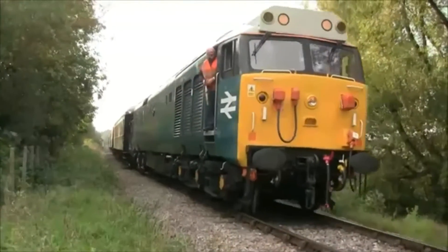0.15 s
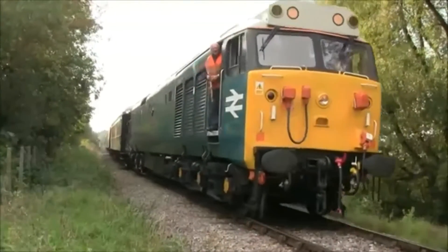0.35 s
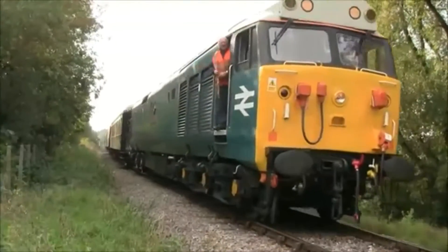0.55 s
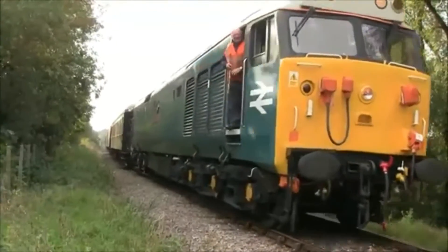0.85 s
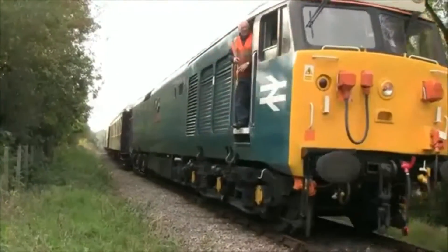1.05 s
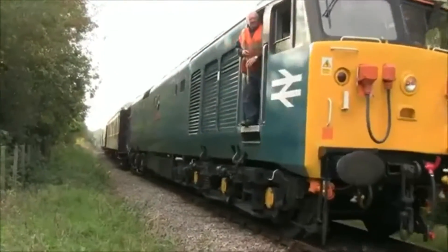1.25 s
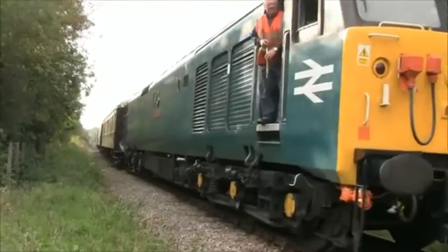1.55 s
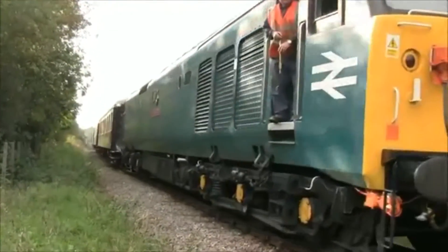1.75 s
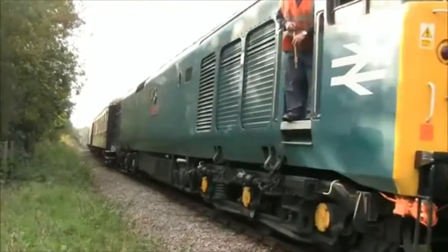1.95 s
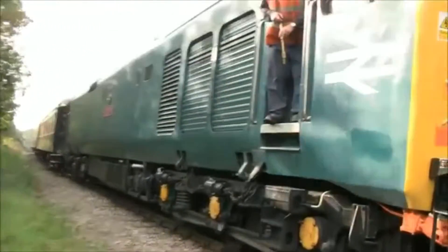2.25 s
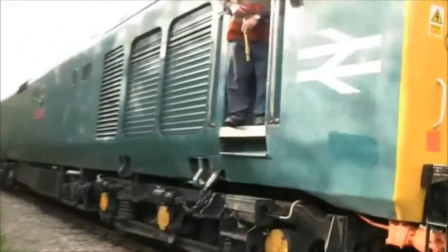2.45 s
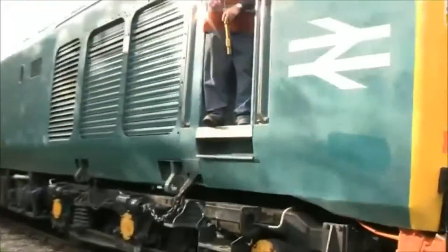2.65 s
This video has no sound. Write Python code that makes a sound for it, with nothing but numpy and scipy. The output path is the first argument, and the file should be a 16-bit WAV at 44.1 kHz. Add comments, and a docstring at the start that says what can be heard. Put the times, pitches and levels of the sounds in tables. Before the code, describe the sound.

A diesel locomotive rolls past close by, engine throbbing loudly over hissing steel wheels.

```python
"""A sixteen-cylinder diesel locomotive engine runs hard and steadily as it rolls along the track.
Its uneven firings ring down the exhaust pipe and throb over a deep, beating boom. The engine room
clatters, and gears and blowers whine. Steel wheels roar, hiss and ring on the rails, and near the
start a flange (the lip of a wheel) squeals briefly. A bright hiss surges about twice a second."""
import sys
import numpy as np
from scipy import signal
from scipy.fft import rfft, irfft, next_fast_len
from scipy.io import wavfile
from scipy.ndimage import uniform_filter1d, minimum_filter1d, map_coordinates

SR = 44100
rng = np.random.default_rng(int(sys.argv[2]) if len(sys.argv) > 2 else 0)


def to_wav(sig):
    """Store sig (one row per channel, or 1-D mono) as 16-bit WAV at the path in sys.argv[1].

    Samples outside -1..1 are clipped; the rate is SR.
    """
    pcm = np.clip(np.atleast_2d(sig), -1, 1) * 32767
    pcm = np.round(pcm).astype(np.int16)
    wavfile.write(sys.argv[1], SR, pcm.T)  # frames by channels


N = 123479

CYCLE_HZ, CYLINDERS = 7.66, 16  # in one cycle the crank turns twice and each cylinder fires once
SIDES = np.array([[.5], [-.5]])  # each channel's share of a left-right difference

# tone colour of the low and the upper exhaust (frequency [Hz], relative level [dB])
LOW_EXHAUST_SPECTRUM = [(15,-42),(30,-25),(39,-13),(51,-18),(85,-10),(120,-3),(175,-.5),(215,-1.5),(280,-14),(600,-40),(2000,-120)]
UPPER_EXHAUST_SPECTRUM = [(40,-66),(120,-10),(190,-13),(225,-0.5),(290,2),(345,1),(410,-5),(700,-54),(2000,-24),(6000,-120)]
# how alike the exhaust is left and right (frequency [Hz], likeness [0 to 1])
EXHAUST_LIKENESS = [(150,.99),(500,.96)]
# the engine's volume controls (time [s], low exhaust [dB], upper exhaust [dB], engine room [dB])
ENGINE_GAINS = [(0,-17.5,-17.5,-17),(0.25,-19.5,-23,-16.5),(0.55,-19,-19,-17),(0.85,-15.5,-17.5,-16.5),(1.05,-21.5,-17,-17),(1.25,-16.5,-18.5,-15),(1.45,-17.5,-20,-16),(1.62,-19,-15.5,-15),(1.8,-18,-17.5,-16),(2.05,-16.5,-17.5,-13),(2.25,-20.5,-17.5,-14.5),(2.45,-16,-16.5,-15),(2.8,-20.5,-20,-16.5)]
# heavy exhaust beats that set the pipe booming (peak time [s], pitch [Hz], level [dB])
PIPE_BEATS = [(.14,177,-16),(.34,350,-19),(.8,172,-14),(.94,166,-23),(1.37,170,-18.5),(1.45,220,-16.5),(2.12,269,-15.5),(2.28,294,-21),(2.43,294,-16.5),(2.46,226,-16.5),(2.55,258,-18)]
# the deep boom (time [s], pitch [Hz], level [dB])
DEEP_BOOM = [(0,62,-23),(.15,61.4,-20.5),(.24,64,-22),(.3,63.4,-38),(.38,62.3,-18.5),(.47,61.2,-22.5),(.58,63.6,-20),(.66,64.4,-32.5),(.78,60.4,-20),(.92,61,-23),(1.0,72.8,-20),(1.62,72.15,-22),(2.05,72.1,-22),(2.17,72.6,-28),(2.27,73.2,-20.5),(2.4,75,-23),(2.52,76,-31.5),(2.62,73,-19.5),(2.8,72.9,-26)]
# strong tones in the engine's hum (pitch [times the cycle rate], level [dB])
HUM_TONES = [(19,-32),(22,-31),(24,-27.5),(29,-32),(32,-34),(34,-32),(36,-32),(40,-33),(42,-35)]
# tone colour of the engine room (frequency [Hz], relative level [dB])
ROOM_SPECTRUM = [(40,-90),(200,-9.5),(400,-17.5),(520,-3.5),(660,2),(830,0.2),(930,-5.5),(1050,-9),(1500,-12.5),(3000,-27.5),(7000,-36.5),(12000,-120)]
# whines of gears and blowers (pitch [Hz], level [dB])
GEAR_WHINES = [(476.3,-31.5),(508.6,-35),(952.8,-38)]
# one more whine that comes and goes (time [s], level [dB])
SWELLING_WHINE = [(0,-22),(.13,-27),(.25,-42),(.85,-32),(1.08,-25),(1.17,-19.5),(1.32,-37),(1.62,-33),(1.8,-24),(2.0,-28.5),(2.6,-29),(2.8,-24.5)]
# the wheels' volume controls (time [s], roar [dB], hiss [dB])
WHEEL_GAINS = [(0,-17,-24),(0.4,-19.5,-23.8),(0.7,-18.5,-26),(1.3,-18.5,-26.5),(2,-21,-27),(2.8,-19.5,-26.5)]
# tone colour of the wheels' roar and hiss (frequency [Hz], relative level [dB])
ROAR_SPECTRUM = [(40,-74),(300,-15.5),(900,-7),(1250,0.5),(1520,1.5),(1900,-0.5),(2450,-4.5),(2780,-3),(3100,-7.5),(5000,-9),(8000,-65),(14000,-90)]
HISS_SPECTRUM = [(300,-70),(1500,-42),(3000,-1.5),(3600,0),(4000,1),(4190,1.5),(4400,0.5),(4900,-5),(5600,-4),(6500,-10),(8500,-10),(11000,-16),(14000,-24),(15300,-38)]
# how alike the hiss and its surges are left and right (frequency [Hz], likeness [0 to 1])
HISS_LIKENESS = [(3000,0.47),(5000,0.23),(6500,0.92),(8000,0.47),(11000,0.27),(15000,0.32)]
# jolts of the wheels and axles (peak time [s], boost [dB])
WHEEL_JOLTS = [(.11,1),(.46,1),(.64,1),(.83,1.5),(1.0,1.5),(1.32,0.5),(1.42,1),(1.58,2),(1.72,1.1),(1.91,2.5),(2.04,1.3),(2.16,3),(2.35,1),(2.52,3),(2.63,0.9)]
# notes at which wheels and rails ring (pitch [Hz], nominal width [Hz], relative level [dB])
STEEL_NOTES = [(248.7,12,-1.5),(443.6,20.7,5),(492.7,57,2),(559,23,7),(587,19,4),(726,19,-8),(894,17,-1),(968,85,-6.5),(1170,42,-1.5),(1490,52,-3),(1720,28,-19),(2207,63,-7.5),(2348,54,-8),(2834,64,-9),(3476,58,-12.5),(4164,62,-10.5)]
# brief rings of the wheels (peak time [s], pitch [Hz], level [dB])
WHEEL_RINGS = [(.12,2745,-28),(.17,3299,-31),(.54,2740,-27.5),(.64,1550,-24.5),(.97,4420,-34),(1.07,1330,-23),(1.6,1527,-25),(1.78,2740,-29.5),(2.15,4424,-29.5),(2.42,2820,-29)]
# noisy parts of the squeal (start [s], peak [s], end [s], start pitch [Hz], end pitch [Hz],
# width [Hz], level [dB], left minus right [dB])
SQUEAL_BANDS = [(0.08,0.21,.35,5540,6080,260,-21.5,-4),(.13,0.3,.58,8000,8650,800,-26,0),(.03,0.3,0.6,5500,5300,800,-23,-1.5),(.6,0.635,0.68,12600,12600,300,-35,0)]
# the rough tone at the core of the squeal (time [s], pitch [Hz], level [dB])
SQUEAL_CORE = [(.1,5600,-55),(.16,5720,-29),(.21,5830,-26),(.25,5970,-16),(.28,6040,-27),(.34,6100,-80)]
# short surges of bright hiss, about two a second (start time [s], level [dB])
HISS_SURGES = [(.42,-31),(.895,-33),(1.355,-30),(1.84,-31),(2.295,-30.5)]
# tone colour of the surges (frequency [Hz], relative level [dB])
SURGE_SPECTRUM = [(3000,-25),(5000,1),(7000,4),(10000,-4),(13000,-8),(15500,-14)]
# how far the left microphone's wave is ahead of the right's (frequency [Hz], lead [radians])
MIC_LEAD = [(2900,0),(3500,.3),(4200,.8),(5200,1.95),(6000,3.0),(6500,3.14)]
# how much louder the left microphone is (frequency [Hz], left minus right [dB])
MIC_PAN = [(2600,0),(3500,-2.6),(4200,-4.4),(5000,-4.4),(6200,0),(7000,.6),(9500,4.2),(15000,2.6)]


def exhaust(cycle, spectrum, spread_db=3, jitter_s=0.00037, pipe_fade_s=0.13, throb=0.23):
    """Uneven firings ring down the pipe, with puffs of gas that swell once a crank turn."""
    fired = np.flatnonzero(np.diff(np.floor(cycle * CYLINDERS)))  # the sample of each firing
    strengths = amp(spread_db * rng.standard_normal(CYLINDERS))
    sizes = strengths[np.arange(len(fired)) % CYLINDERS]
    late = jitter_s * SR * rng.standard_normal(N)[fired]
    starts = np.clip(fired + late, 0, N - 1).astype(int)
    pulses = np.bincount(starts, sizes - sizes.mean(), N)  # only the unevenness is kept
    t = np.arange(SR // 4) / SR
    pipe = rng.standard_normal(len(t)) * amp(-60 * t / pipe_fade_s)
    ringing = signal.fftconvolve(pulses, pipe)[:N]
    notes = unit(filtered(ringing, lambda hz: amp(along(spectrum, hz))))
    puffs = shaped_noise(spectrum, EXHAUST_LIKENESS, 1 + throb * np.cos(2 * np.pi * 2 * cycle))
    return amp(-5.5) * notes + amp(-2) * puffs


def brief_rings(rows, width_s, waver_hz):
    """The pipe or a wheel rings: each row's note swells and fades, a little unsteady in pitch."""
    return sum(swell(peak, width_s) * tone(turns_of(hz + waver_hz * wobble(30.02)), db)
               for peak, hz, db in rows)


def boom_and_hum(cycle, waver_db=2):
    """A deep boom rises and dips under a hum whose pitch follows the engine's speed."""
    boom_hz, boom_db = curves(DEEP_BOOM)
    hum = sum(tone(multiple * cycle, db + waver_db * wobble(3.68)) for multiple, db in HUM_TONES)
    return tone(turns_of(boom_hz), boom_db) + hum


def engine_room(cycle, clatter=0.016):
    """Injectors and valves clatter: a flickering noise that pulses faintly with the firings."""
    pulsing = 1 + clatter * np.cos(2 * np.pi * CYLINDERS * cycle)
    likeness = [(600, 1.0), (1000, 0.73)]
    return amp(-0.5 + 1.23 * wobble(39.88)) * shaped_noise(ROOM_SPECTRUM, likeness, pulsing)


def whines(swelling_hz=812, waver_hz=0.96, waver_db=2):
    """Spinning gears and blowers sing thin, wavering tones."""
    whine = lambda hz, db: tone(turns_of(hz + waver_hz * wobble(11.8)), db)
    swelling = whine(swelling_hz, *curves(SWELLING_WHINE))
    return swelling + sum(whine(hz, db + waver_db * wobble(5.87)) for hz, db in GEAR_WHINES)


def wheels(judder_db=0.77, ring_db=-19.5):
    """Rough steel rolling on steel roars, hisses and rings, with jolts and a quick judder."""
    roar_db, hiss_db = curves(WHEEL_GAINS)
    jolts_db = sum(db * swell(peak, width_s=0.032) for peak, db in WHEEL_JOLTS)
    shake_db = jolts_db + judder_db * unit(np.gradient(wobble(39.87)))
    roar_gain = amp(roar_db - 2 + shake_db + 1.2 * wobble(70))
    roar = roar_gain * shaped_noise(ROAR_SPECTRUM, likeness=[(1300, 1.0), (3000, 0.95)])
    hiss = amp(hiss_db + shake_db + 0.46 * wobble(44.8)) * shaped_noise(HISS_SPECTRUM, HISS_LIKENESS)
    steel = lambda f: sum(amp(db) * (1j * f * width / (hz * hz - f * f + 1j * f * width)) ** 2
                          for hz, width, db in STEEL_NOTES)  # one narrow peak for each note
    ring = unit(filtered(rng.standard_normal((2, N)), steel))
    return roar + hiss + amp(ring_db + 2.1 * wobble(8.12)) * ring


def flange_squeal(stereo_spread=0.47, waver_hz=60, rough_db=3, core_pan_db=-4, lead_turns=-.08):
    """A wheel's lip scrapes the rail: a thin rising tone and narrow bands of noise swell and fade."""
    t = np.arange(N) / SR
    bands = np.zeros((2, N))
    for start, peak, end, from_hz, to_hz, width, db, pan_db in SQUEAL_BANDS:
        noise = rng.standard_normal(N) + stereo_spread * rng.standard_normal((2, N))
        flutter = unit(filtered(noise, lambda hz: 1 / (1 + (2 * hz / width) ** 2)))
        pitch_hz = np.interp(t, [start, end], [from_hz, to_hz])
        band = flutter * tone(turns_of(pitch_hz), db + SIDES * pan_db)  # smears the tone into noise
        bands += np.interp(t, [start, peak, end], [0, 1, 0]) * band
    core_hz, core_db = curves(SQUEAL_CORE)
    turns = turns_of(core_hz + waver_hz * wobble(251)) + SIDES * lead_turns
    return bands + tone(turns, core_db + rough_db * wobble(149) + SIDES * core_pan_db)


def hiss_surges(rise_s=0.018, hold_s=0.037, fall_s=0.073):
    """Short surges of bright hiss, about two a second."""
    t = np.arange(N) / SR
    corners = np.cumsum([0, rise_s, hold_s, fall_s])
    bursts = sum(amp(db) * np.interp(t - start, corners, [0, 1, 1, 0]) for start, db in HISS_SURGES)
    return bursts * shaped_noise(SURGE_SPECTRUM, HISS_LIKENESS)


def amp(db):
    """Turn decibels into a number to multiply by."""
    return 10 ** (np.asarray(db) / 20)


def unit(x):
    """Scale x to an average (rms) strength of 1."""
    return x / np.sqrt(np.mean(x ** 2) + 1e-20)


def along(points, hz):
    """Read between (frequency, value) points, spaced as musical pitch is."""
    frequencies, values = np.transpose(points)
    return np.interp(np.log(hz + 1), np.log(frequencies + 1), values)


def curves(rows):
    """Give one value per sample for each column after the time."""
    times, *columns = np.transpose(rows)
    return [np.interp(np.arange(N) / SR, times, column) for column in columns]


def wobble(rate):
    """A smooth curve through `rate` random points a second."""
    return map_coordinates(rng.standard_normal(4096), [np.arange(N) * rate / SR + 2], mode="mirror")


def swell(peak, width_s):
    """A bell-shaped rise and fall, at 61% height width_s either side of the peak."""
    return np.exp(-.5 * ((np.arange(N) / SR - peak) / width_s) ** 2)


def turns_of(hz):
    """Count the cycles completed at a changing rate."""
    return np.cumsum(hz) / SR


def tone(turns, db):
    """A sine wave at an average (rms) level, starting anywhere in its cycle."""
    return np.sqrt(2) * amp(db) * np.sin(2 * np.pi * (turns + rng.random()))


def filtered(x, response):
    """Scale and shift each frequency in x by response(hz)."""
    size = next_fast_len(N + SR // 2)
    return irfft(rfft(x, size) * response(np.fft.rfftfreq(size, 1 / SR)), size)[..., :N]


def shaped_noise(spectrum, likeness, pulsing=1):
    """Stereo noise of strength 1, pulsed and then given a tone colour."""
    def colour(hz):
        angle = np.arccos(np.clip(along(likeness, hz), -1, 1)) / 2  # 0 makes both sides the same
        return amp(along(spectrum, hz)) * [np.cos(angle), np.sin(angle)]
    mid, side = filtered(pulsing * rng.standard_normal((2, N)), colour)
    return unit(np.array([mid + side, mid - side]))


def scene(speed_drift=.0015):
    """One crankshaft times the exhaust, clatter and hum; the wheels run beneath."""
    cycle = turns_of(CYCLE_HZ * (1 + speed_drift * wobble(2)))
    low_db, upper_db, room_db = curves(ENGINE_GAINS)
    engine = amp(low_db) * exhaust(cycle, LOW_EXHAUST_SPECTRUM)
    engine += amp(upper_db) * exhaust(cycle, UPPER_EXHAUST_SPECTRUM)
    engine += brief_rings(PIPE_BEATS, width_s=0.032, waver_hz=3)
    engine += amp(room_db) * engine_room(cycle) + boom_and_hum(cycle) + whines()
    rolling = wheels() + brief_rings(WHEEL_RINGS, width_s=0.021, waver_hz=6)
    return engine + rolling + hiss_surges() + flange_squeal()


def record(dry, ceiling=.98, hold_s=.002, top_hz=15500):
    """Two microphones spread the treble; peaks are turned down and the very highest pitches cut."""
    mics = lambda hz: amp(SIDES * along(MIC_PAN, hz)) * np.exp(1j * SIDES * along(MIC_LEAD, hz))
    heard = filtered(dry, mics)
    window = int(hold_s * SR) | 1  # an odd number of samples
    needed_gain = ceiling / np.maximum(np.abs(heard).max(axis=0), ceiling)
    smooth_gain = uniform_filter1d(minimum_filter1d(needed_gain, window), window)
    return filtered(heard * smooth_gain, lambda hz: hz < top_hz)


dry = scene()
out = record(dry)
to_wav(out)
```